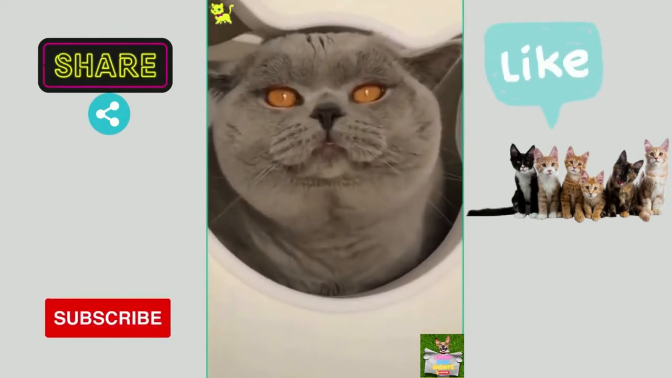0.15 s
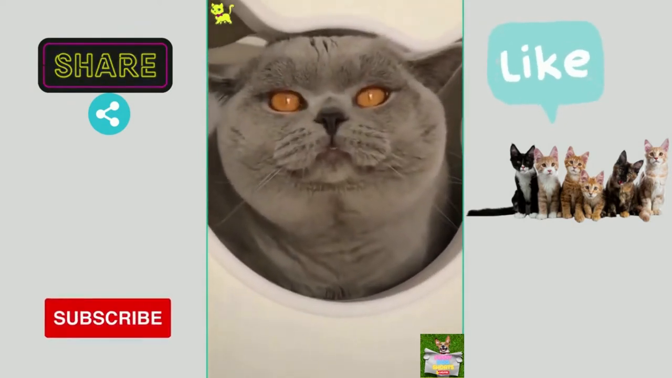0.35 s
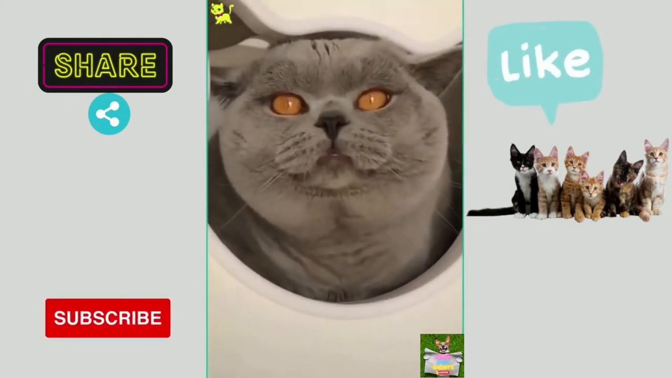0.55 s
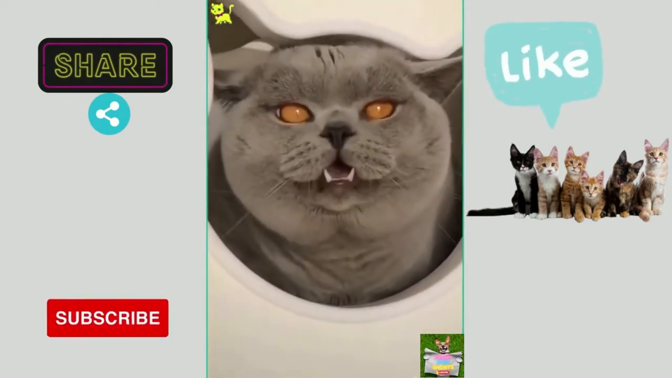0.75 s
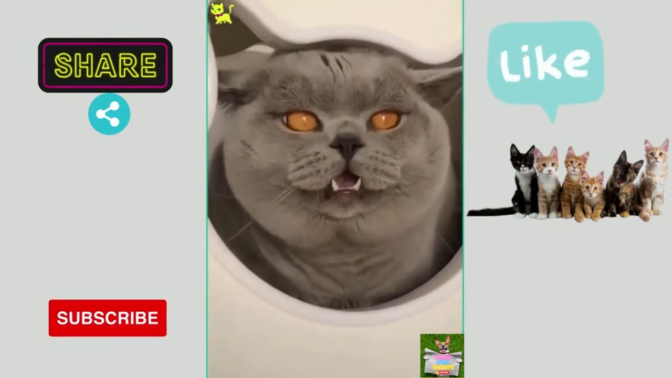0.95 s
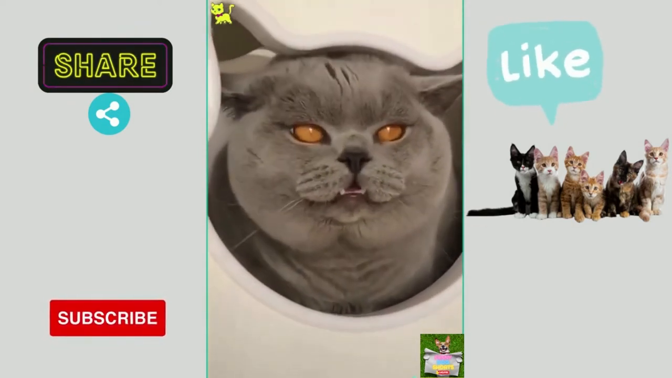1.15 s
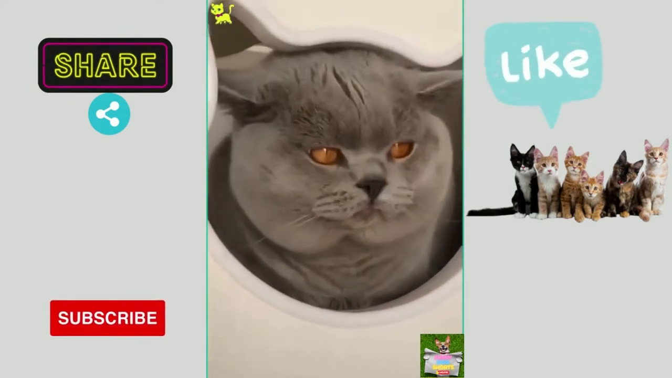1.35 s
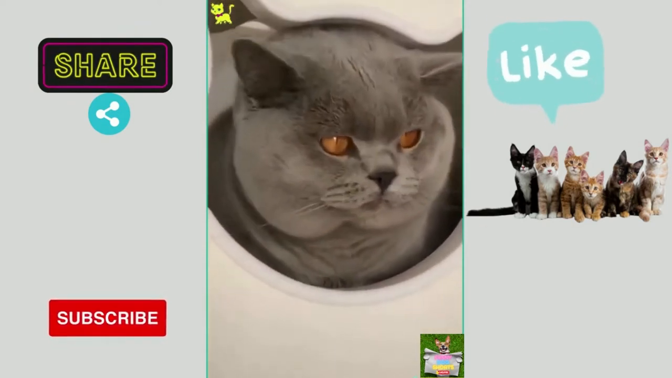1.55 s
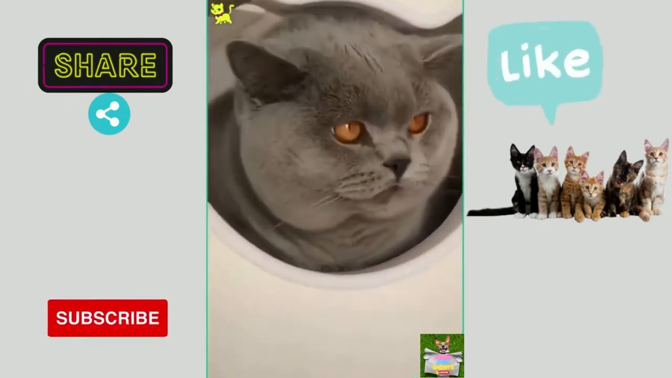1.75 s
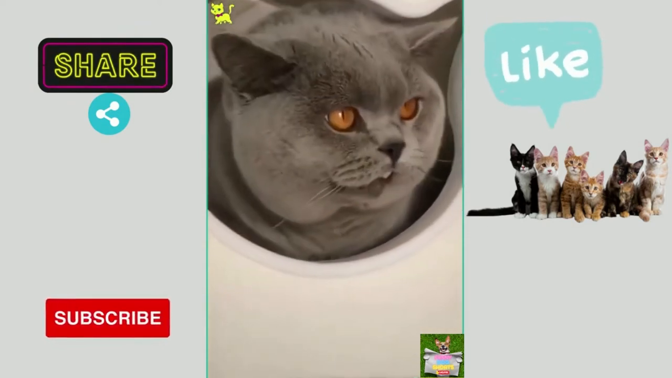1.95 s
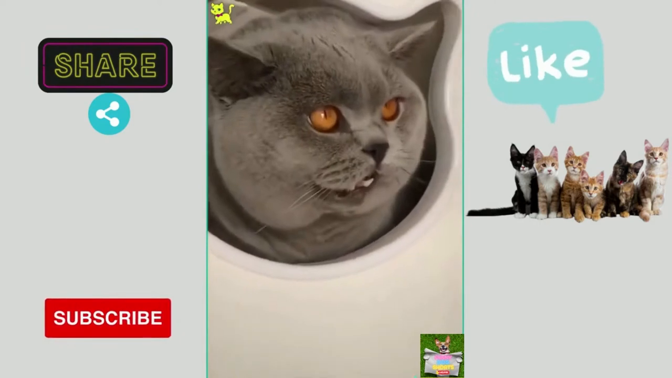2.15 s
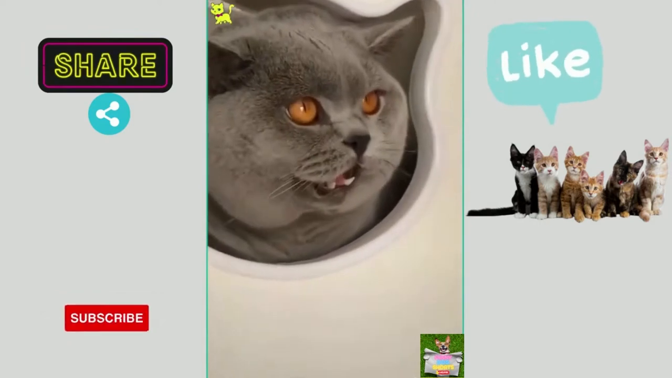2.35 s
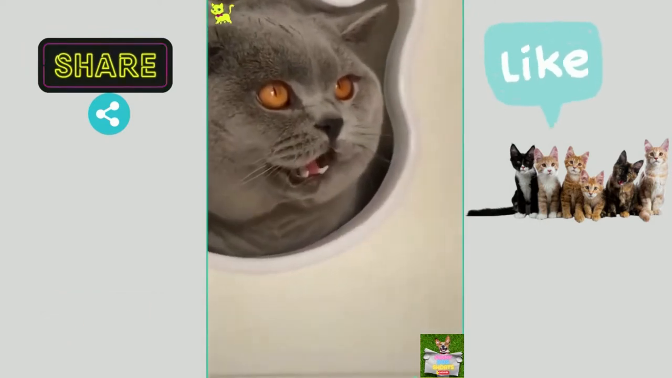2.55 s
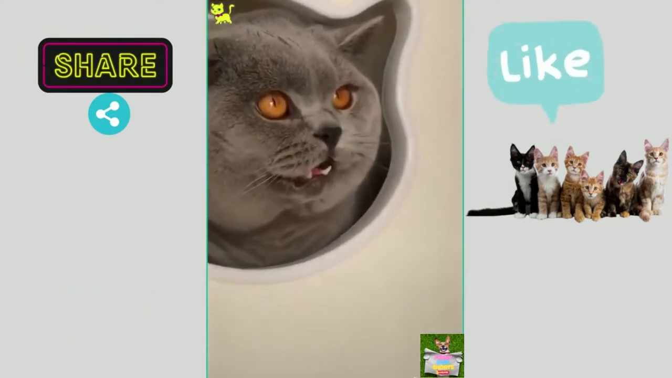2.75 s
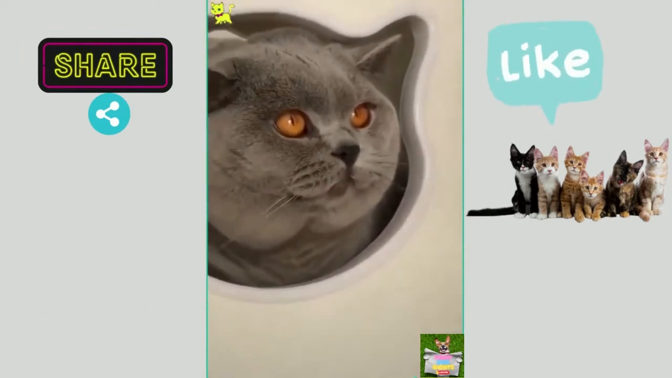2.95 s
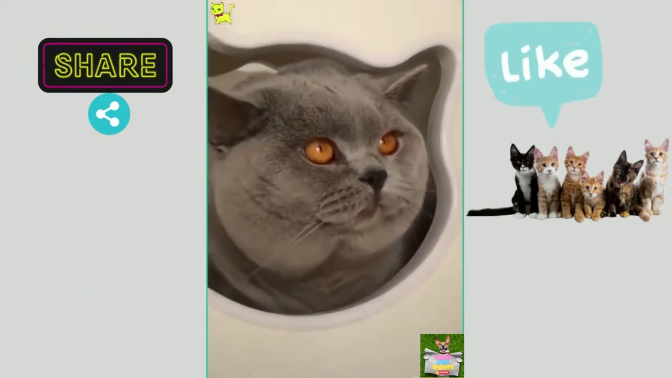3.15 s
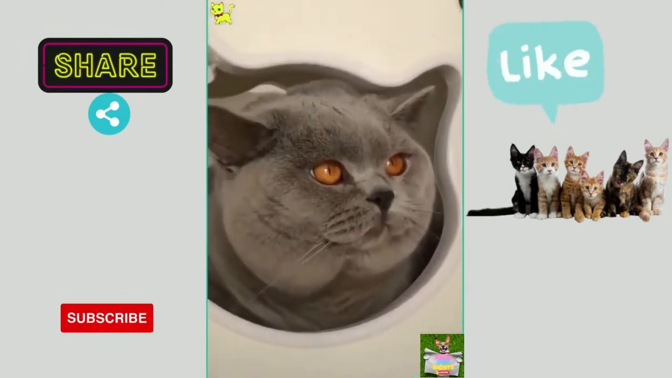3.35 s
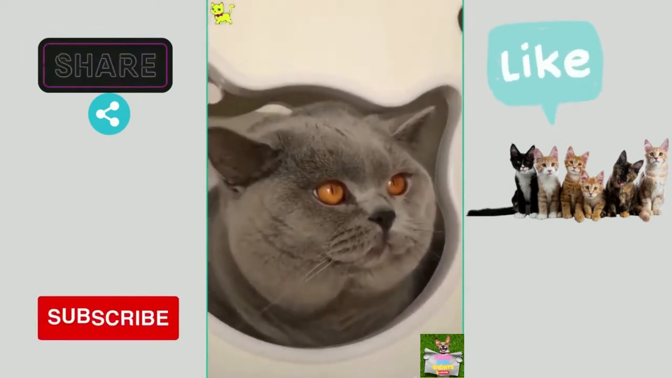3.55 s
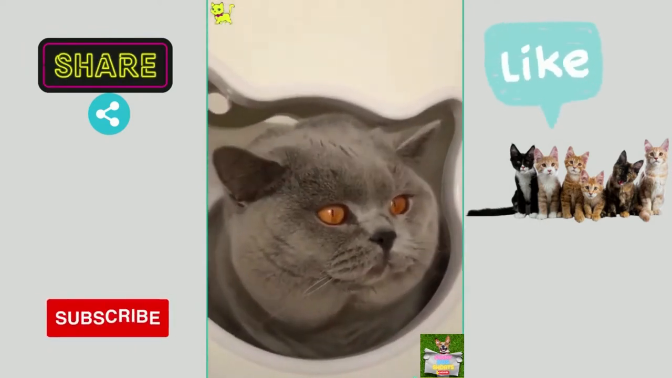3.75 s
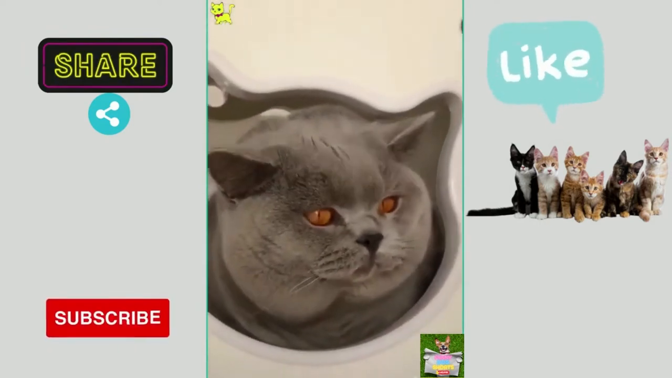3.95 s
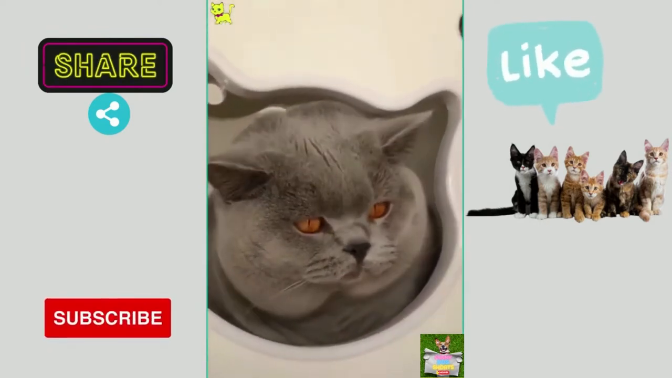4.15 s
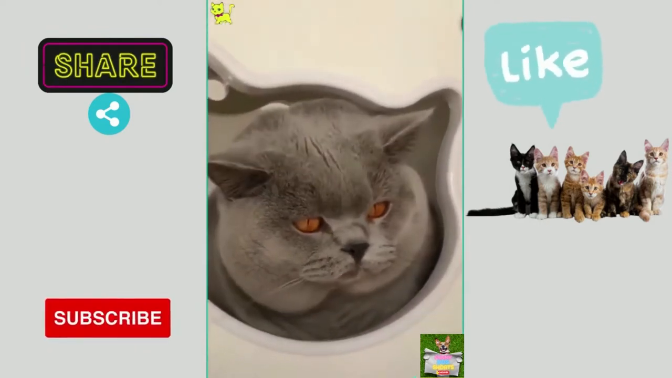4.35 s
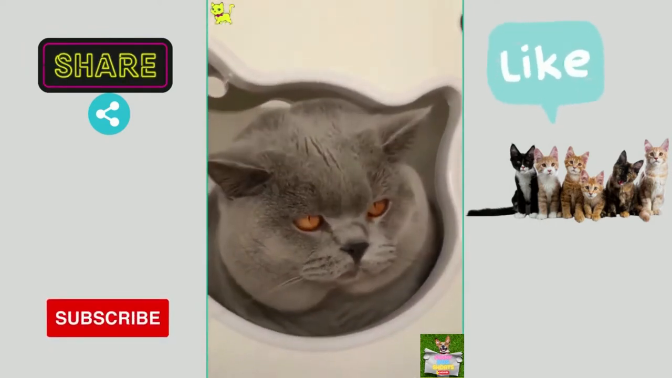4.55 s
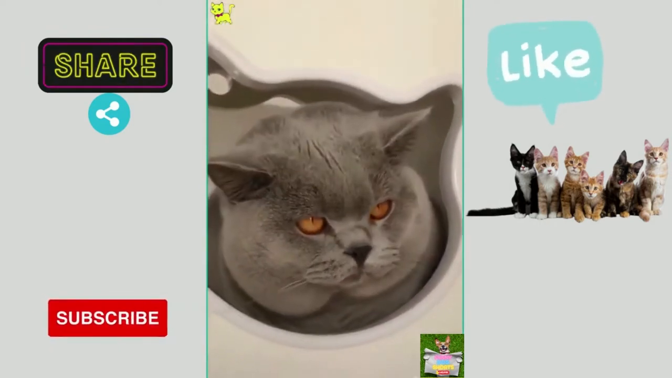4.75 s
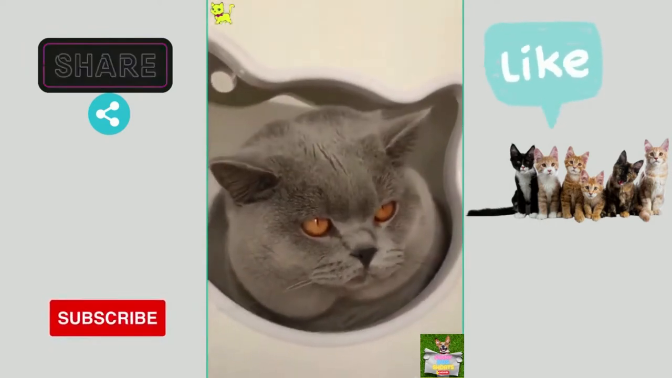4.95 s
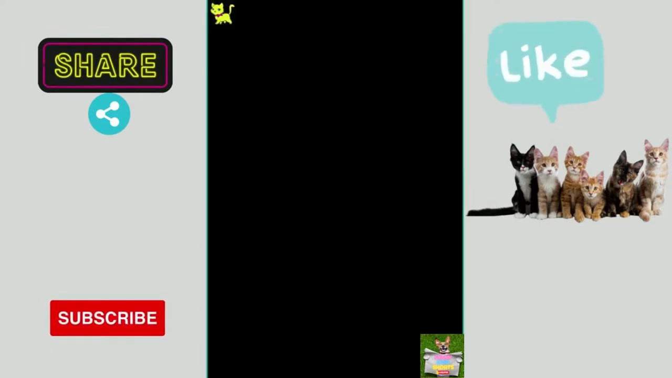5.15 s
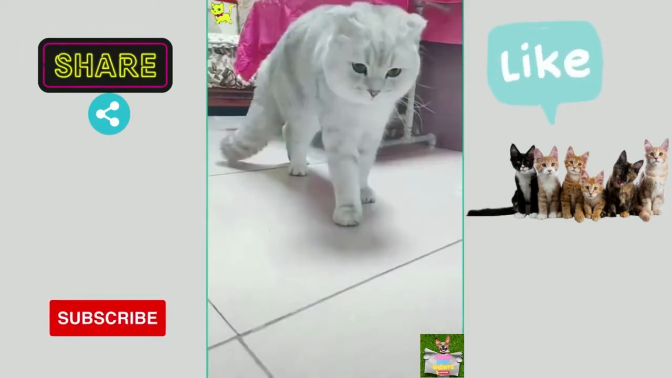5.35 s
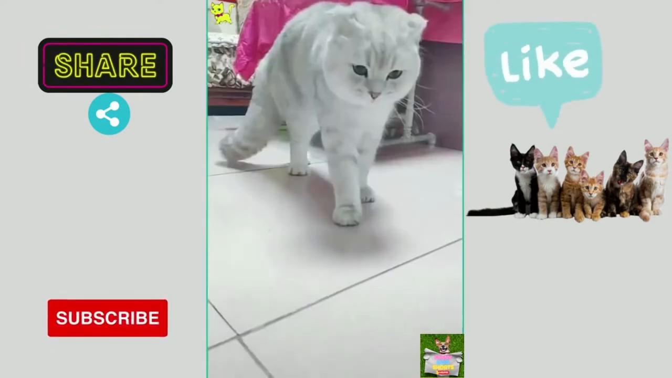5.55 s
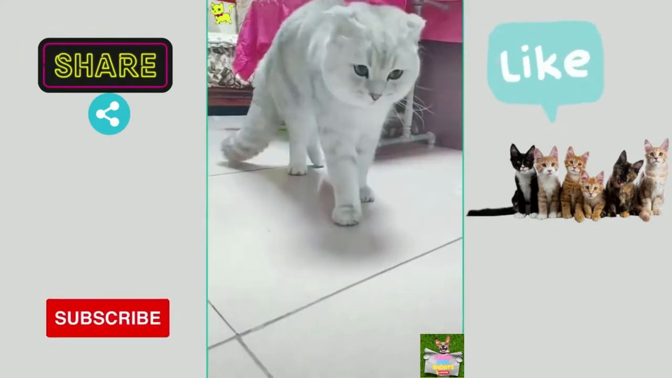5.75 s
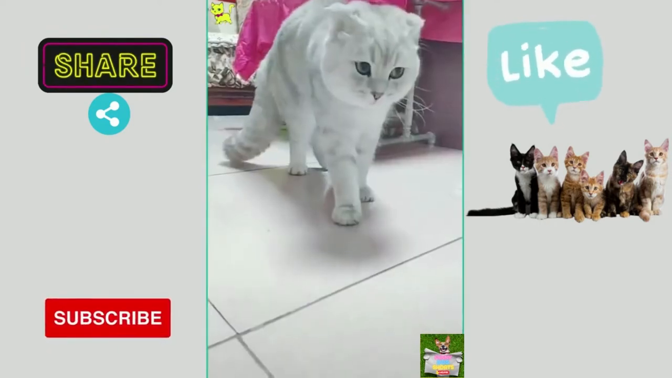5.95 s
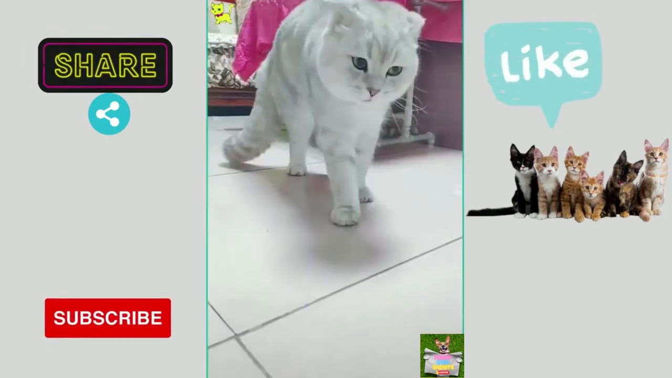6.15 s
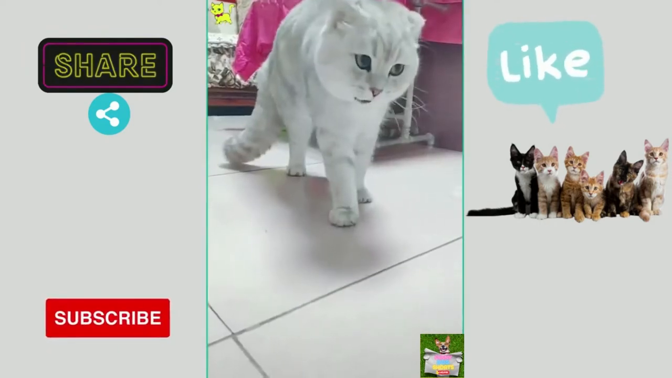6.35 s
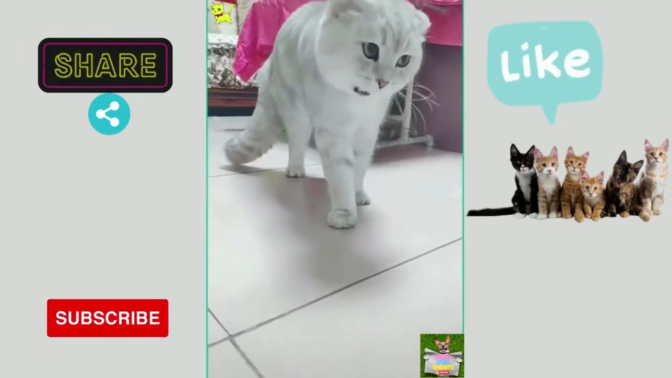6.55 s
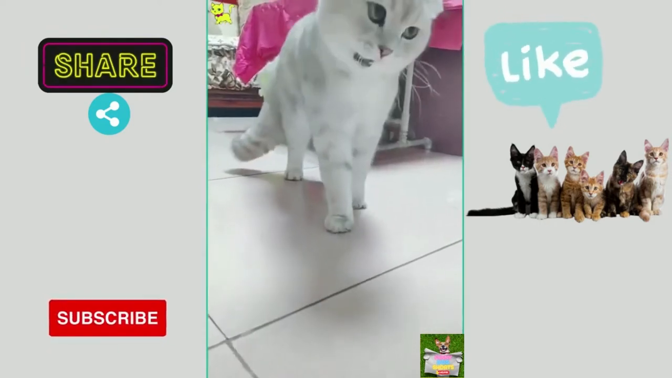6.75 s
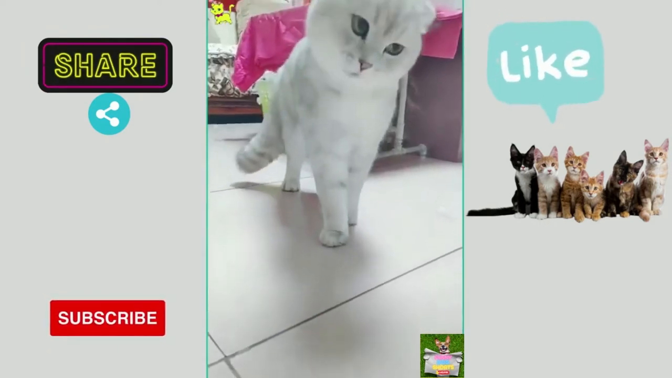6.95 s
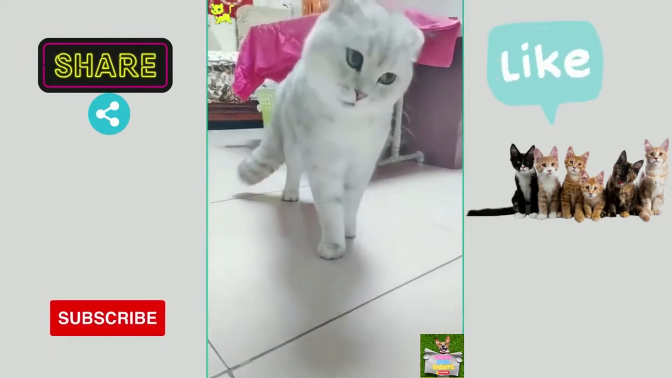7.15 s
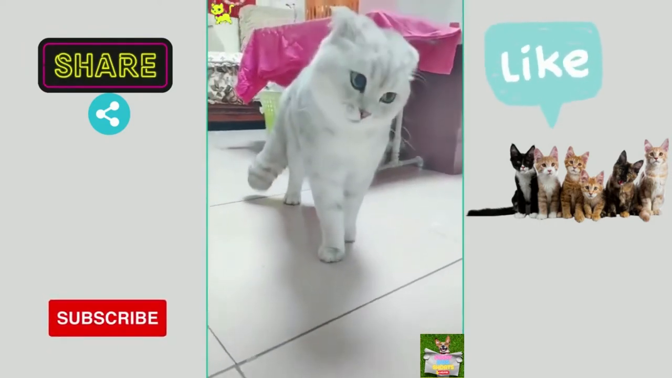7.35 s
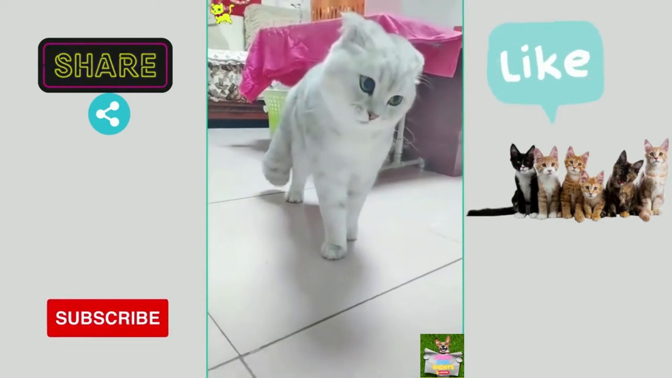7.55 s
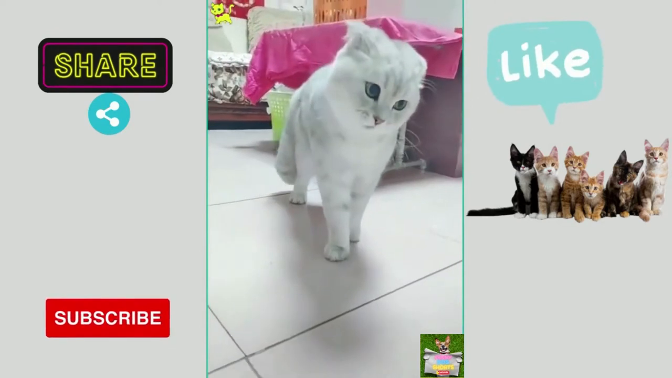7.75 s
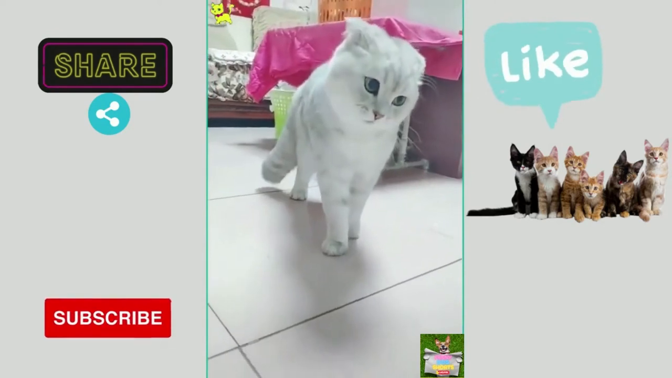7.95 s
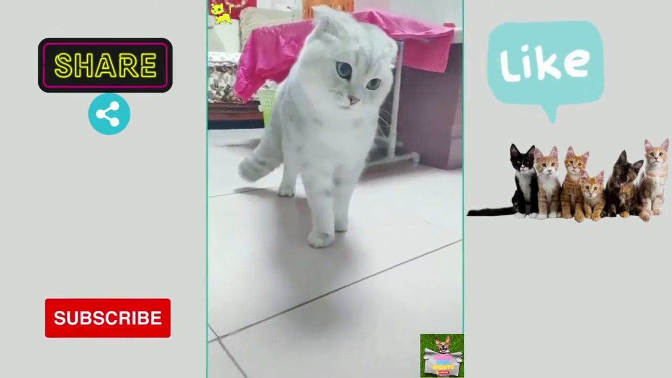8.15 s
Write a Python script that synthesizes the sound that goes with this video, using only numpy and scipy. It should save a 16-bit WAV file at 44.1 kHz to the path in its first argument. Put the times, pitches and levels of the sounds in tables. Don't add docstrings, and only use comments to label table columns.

```python
import sys
import numpy as np
from scipy import signal
from scipy.fft import rfft, irfft
from scipy.io import wavfile
from scipy.ndimage import uniform_filter1d, minimum_filter1d

SR = 44100
rng = np.random.default_rng(int(sys.argv[2]) if len(sys.argv) > 2 else 0)


def field_ratio(decibels):
    return 10 ** (np.asarray(decibels, dtype=float) / 20)


def generate_wav(signal):
    frames = np.transpose(np.atleast_2d(signal))
    scaled = np.clip(frames, -1, 1) * 32767
    pcm = np.round(scaled).astype(np.int16)
    wavfile.write(sys.argv[1], SR, pcm)


N = 362040

CUT_S = (5.333, 5.401)
# f/Hz, density/dB per Hz
HUM_AIR = [(12, -6), (20, 0), (60, 0.5), (108, -11.5), (137, -20), (284, -18), (762, -29), (988, -27.5),
           (1190, -28.5), (2100, -28), (2330, -34), (2590, -33.5), (4470, -41.5), (8340, -48),
           (10000, -45.5), (13000, -89), (22000, -120)]
HUM_DB = -41.5
# f/Hz, width/Hz, level/dB
HUM_LINES = [(54.4, 11, -49.5), (100.3, 1.1, -46.5)]
# t/s, rise/s, first level/dB, running level/dB
MOTOR = (4.05, .25, -68, -61)
# f/Hz, width/Hz, level/dB
MOTOR_LINES = [(2150, 60, -3), (2560, 80, 0), (3010, 70, -5), (3450, 70, -8)]
# f/Hz, density/dB per Hz
TILE_AIR = [(20, 0.5), (50, -11), (300, -23.5), (1000, -30), (2500, -33.5), (6000, -31), (8500, -35.5),
            (10000, -29.5), (12500, -28.5), (14000, -72)]
# first/dB, last/dB
TILE_DB = (-61.5, -57)
TILE_RISE_S, AFTER_CALL_DB = 0.69, 5
# t60/s, level/dB, slow dark tail/dB
GREY_ROOM = (0.39, -7.5, -10.5)
# t60/s, level/dB, slow dark tail/dB
WHITE_ROOM = (0.36, -8, -33.5)
# f/Hz, width/Hz, level/dB
GREY_MODES = [(1800, 30, 6), (1050, 210, -7)]
# f/Hz, width/Hz, level/dB
TILE_MODES = [(900, 5.6, 1), (384, 8, -10)]

# t/s, peak level/dB, f/Hz, ring t60/s, width/share of f
SMACKS = [
    (0.623, -28, 900, 0.016, 1.5),
    (4.789, -30, 1100, 0.014, 2.4),
    (4.843, -35, 1440, 0.036, 2.1),
    (5.401, -28, 494, 0.014, 1.55),
    (5.413, -46.5, 670, 0.018, 1.8),
    (0.3601, -44.5, 4440, 0.017, 0.25),
    (0.6, -42, 5600, 0.03, 0.19),
    (5.8132, -46.5, 7260, 0.016, 0.25),
    (5.875, -31, 10150, 0.016, 0.41),
    (5.917, -40, 5550, 0.014, 0.18),
]
# t/s, length/s, high whistle level/dB, low whistle level/dB
SNIFFS = [
    (7.894, .035, -35, -44),
    (7.92, .2, -44.5, -53.5),
    (8.025, .075, -34.5, -45),
    (8.15, .06, -52, -60),
    (5.88, .35, -70, -75),
    (4.52, .12, -66, -65),
    (4.84, .12, -62, -57),
    (7.7, .08, -73, -48),
]
# f/Hz, width/Hz
NOSE = [(9500, 1600), (5940, 8400)]
# start/s, end/s
TOP_S = (6.25, 7.92)
# f/(SR / 64), level/dB
TOP_TONES = [(11, -5), (12, -4.5), (13, -3), (14, 8), (15, 3), (16, 0), (17, -4.5), (18, -1.5), (19, -19)]
TOP_DB = (-5.5, -14.5)
TOP_FOLLOWS = (1.35, 0.96)

# t/s, half length/s, added roughness/0-1
RASPS = [(.64, .1, .55), (.76, .16, .3), (1.05, .25, .16), (2.54, .08, .2), (2.4, .2, .05), (3.05, .3, .14),
         (4.86, .25, .45), (6.17, .05, .18), (6.35, .24, .11), (6.8, .3, .03), (7.14, .09, .13),
         (7.87, .07, .4)]
SMOOTH_ROUGHNESS = .05
# f/Hz, width/Hz
NOTCH = (3350, 1200)

# t/s, pitch/Hz, effort/dB, tongue resonance/Hz, opening/0-1
GREY_START = [
    (.64, 402.5, -56.5, 1143, .9),
    (.698, 443.7, -35.5, 1100, 0.79),
    (.792, 429.3, -38.5, 1505, 0.86),
    (.832, 361.7, -39, 1460, 0.75),
    (1.04, 338.9, -33.5, 1737, 0.8),
    (1.09, 373, -37, 1544, 0.7),
    (1.122, 350.7, -36, 1495, 0.7),
    (1.28, 388.3, -37, 1380, 0.5),
    (1.4, 386, -41.5, 1120, 0.4),
]
# t/s, pitch/Hz, effort/dB, tongue resonance/Hz, opening/0-1
GREY_SWELL = [
    (1.62, 400.4, -43.5, 1170, 0.15),
    (1.699, 403.3, -36.5, 1150, 0.37),
    (1.801, 412.2, -30, 1230, 0.47),
    (2.032, 444.3, -24, 1970, 0.69),
    (2.445, 504.2, -22, 1800, 0.53),
    (2.522, 477.8, -22.5, 1910, 0.74),
    (2.598, 482.2, -21.5, 1780, 0.69),
    (2.77, 473, -18.5, 1950, 0.61),
    (2.944, 440, -23.5, 1800, 0.7),
]
# t/s, pitch/Hz, effort/dB, tongue resonance/Hz, opening/0-1
GREY_MOAN = [
    (3.08, 388.4, -51, 1380, 0.069),
    (3.336, 271.8, -54.5, 1070, 0.12),
    (3.648, 257.2, -53.5, 1037, .2),
    (3.881, 260.1, -54, 1022, 0.15),
    (4.06, 224.2, -59, 1164, 0.067),
    (4.392, 259.4, -53, 993, 0.36),
    (4.564, 251.7, -55, 1050, 0.15),
    (4.762, 180, -62.5, 1065, .02),
    (4.859, 170.2, -84, 1154, .1),
]
# f/Hz, f/Hz
GREY_THROAT_HZ = (1905, 2930)
# f/Hz, f/Hz
GREY_PALATE_HZ = (2900, 4916)
# f/Hz, width/Hz, level/dB
GREY_UPPER = [(560, 0), (3350, 500, 6), (5400, 700, -3), (6400, 500, -1), (8600, 400, -22)]
GREY_REF_DB = -35
# level at reference effort/dB, slope/dB per dB, gain when open/dB
GREY_LOW = (-53.5, .1, -12)
# level at reference effort/dB, slope/dB per dB, gain when open/dB
GREY_MOUTH = (-38, 0.46, 1.3)
# level at reference effort/dB, slope/dB per dB, gain when open/dB
GREY_TOP = (-55, 0.33, .1)
# level at reference effort/dB, slope/dB per dB, gain when open/dB
GREY_SHEEN = (-16, .6, .1)
# f/Hz, width/Hz, level/dB
CHEST = (395, 100, 17)
GLARE_HZ, GLARE_DB_PER_HZ = 426, 0.1646
DULL_HZ, DULL_DB_PER_HZ = 353, 0.4

# t/s, pitch/Hz, effort/dB, opening/0-1
WHITE = [
    [(5.4, 321, -33.5, 0.01), (5.46, 360, -41, .01), (5.74, 500.2, -44, 0), (5.88, 538, -38.5, .01)],
    [(5.982, 596.7, -32, 0.08), (6.12, 616.6, -31.5, 0.16), (6.17, 600.4, -27.5, 0.41),
     (6.26, 640.7, -28, 0.19), (6.33, 601.7, -29, 0.14), (6.454, 577.6, -32.5, 0.28),
     (6.48, 542, -27, 0.45)],
    [(6.52, 635, -27, 0.5), (6.602, 795, -22.5, 1), (6.72, 841, -15.5, 1), (6.748, 874.6, -14.5, 1),
     (6.8, 858.2, -14.5, 1), (6.93, 807.3, -12.5, 0.99), (7.04, 755, -13, 0.76), (7.1, 650, -19.5, 0.9),
     (7.15, 641.6, -24.5, 0.4)],
    [(7.222, 653.4, -17, 0.3), (7.236, 632, -17.5, 0.93), (7.275, 631.2, -17, 0.88),
     (7.348, 602.5, -17, 0.69), (7.39, 566.1, -18.5, 0.63), (7.5, 566.7, -27.5, 0.73),
     (7.694, 516, -32, 0.45), (7.82, 465.3, -36, 0.47), (7.89, 371, -24.5, 0.07)],
]
# time of one beat, setting the phase only/s, end/s, rate/Hz, depth/0-1
TRILL = (1.7, 5.62, 31, 0.61)
# f/Hz, f/Hz
WHITE_THROAT_HZ = (2120, 2095)
# f/Hz, f/Hz
WHITE_PALATE_HZ = (4360, 5054)
# f/Hz, width/Hz, level/dB
WHITE_UPPER = [(500, 0), (5800, 700, 0), (6900, 1000, -1)]
# f/Hz, width/Hz, level/dB
JAW = [(1246, 530, 12.5), (878, 370, 15)]
MOUTH_PER_PITCH, PIVOT_HZ, THROAT_HZ_PER_HZ = 2.05, 619, 3.75
LOW_DB_PER_HZ, LOW_SPAN_HZ = 0.1461, 68
OPEN_LOW_DB, LOW_SLOPE, OPEN_MOUTH_DB = -33.5, 0.1, -9
OPEN_TOP_DB, TOP_SLOPE = -9, 0.75
NOSE_DB, NOSE_CLEAR_HZ, NOSE_SPAN_HZ = 9.5, 680, 87.4


def evened(x):
    return x / np.sqrt(np.mean(x ** 2) + 1e-20)


def drift(count, hz):
    return evened(signal.lfilter(*signal.butter(2, 2 * hz / SR), rng.standard_normal(count)))


def add(mix, s, sound):
    part = mix[..., round(s * SR):][..., :sound.shape[-1]]
    part += sound[..., :part.shape[-1]]


def between(ends, share):
    return ends[0] + (ends[1] - ends[0]) * share


def bump(hz, centre, width):
    return (1 + (2 * (hz - centre) / width) ** 2) ** -1.5


def resonate(x, hz, width):
    turn = np.exp(2j * np.pi * np.cumsum(hz * np.ones(len(x))) / SR)
    r = np.exp(-np.pi * width / SR)
    return 2 * (turn * signal.lfilter([1 - r], [1, -r], x / turn + 1e-18)).real


def ring(x, hz, width):
    return evened(resonate(resonate(x, hz, width), hz, width))


def low_pass(x, hz):
    return signal.sosfiltfilt(signal.butter(10, 2 * hz / SR, output="sos"), x)


def air(spectrum, db):
    hz = np.fft.rfftfreq(N, 1 / SR)
    f, level = np.transpose(spectrum)
    shape = field_ratio(np.interp(np.log(hz + 1), np.log(f + 1), level))
    return field_ratio(db) * evened(irfft(rfft(rng.standard_normal(N)) * shape, N))


def narrow(lines):
    hz = np.fft.rfftfreq(N, 1 / SR)
    shape = sum(field_ratio(db) * bump(hz, centre, width) / np.sqrt(width) for centre, width, db in lines)
    return irfft(rfft(rng.standard_normal(N)) * shape, N) * np.sqrt(SR)


def appliance():
    return air(HUM_AIR, HUM_DB) + narrow(HUM_LINES)


def motor():
    t = np.arange(N) / SR
    start, rise, *levels_db = MOTOR
    level = field_ratio(between(levels_db, np.clip((t - start) / rise, 0, 1)))
    return level * (t > start) * narrow(MOTOR_LINES)


def tiled_room_air():
    t = np.arange(N) / SR
    rise = np.clip((t - CUT_S[1]) / TILE_RISE_S, 0, 1)
    tiles = air(TILE_AIR, between(TILE_DB, rise) + AFTER_CALL_DB * (t > TOP_S[1]))
    calling = (t > TOP_S[0]) & (t < TOP_S[1])
    return np.where(calling, low_pass(tiles, 7700), tiles)


def ringing(x, modes):
    return x + sum(field_ratio(db) * resonate(x, hz, width) for hz, width, db in modes)


def room(x, t60, db, late_db):
    t = np.arange(SR // 2) / SR
    taps = rng.standard_normal(len(t)) * (t > .004)
    dull = signal.lfilter(*signal.butter(1, [2 * 700 / SR, 2 * 3000 / SR], "band"), taps)
    bright = signal.lfilter(*signal.butter(2, 2 * 3000 / SR, "high"), taps)
    dark = signal.lfilter(*signal.butter(2, 2 * 1300 / SR), taps)
    tail = dull * field_ratio(-60 * t / t60) + bright * field_ratio(-110 * t / t60)
    tail += dark * field_ratio(late_db - 24 * t / t60)
    return x + field_ratio(db) * signal.fftconvolve(x, tail / np.linalg.norm(tail))[:N]


def starved(x, depth_db):
    hz, s, z = signal.stft(x, SR, nperseg=1024)
    level = uniform_filter1d(abs(z) ** 2, size=4, axis=0)
    loud = -minimum_filter1d(-level, size=41, axis=0)
    weak = level < loud / field_ratio(2 * depth_db)
    dropped = weak & (hz > 450)[:, None] & (abs(s - 6.9) < .95)
    return signal.istft(z * np.where(dropped, .1, 1), nperseg=1024)[1][:N]


def mouth_noises():
    out, t = np.zeros((2, N)), np.arange(1500) / SR
    for s, db, hz, t60, spread in SMACKS:
        tick = ring(rng.standard_normal(len(t)), hz, spread * hz)
        add(out, s, .5 * field_ratio(db - 60 * t / t60) * tick)
    for s, length, high_db, low_db in SNIFFS:
        gust, apart = rng.standard_normal((2, round(length * SR)))
        swell = np.sin(np.pi * np.linspace(0, 1, len(gust)) ** 0.52) ** 2
        high = ring(gust, *NOSE[0]) + 0.15 * ring(apart, *NOSE[0]) * [[1], [-1]]
        low = ring(gust, *NOSE[1])
        add(out, s, swell * (field_ratio(high_db) * high + field_ratio(low_db) * low))
    return out


def top_band(upper_db):
    t, out = np.arange(*TOP_S, 1 / SR), np.zeros((2, N))
    sides = np.array([[1], [-1]])
    blocks = np.arange(len(t)) // 1024
    voice_db = upper_db[round(TOP_S[0] * SR):][:len(t)] + 26
    for k, db in TOP_TONES:
        hz = k * SR / 64
        on, hissy, size, lean, turn, split = rng.random((blocks[-1] + 1, 6)).T
        held = np.arange(len(on)) // 2 * 2
        gains = field_ratio(db + 16 * (size - .5) + 5 * (lean[held] - .5) * sides) * (on[held] < .66)
        phase = uniform_filter1d((4 * turn + 0.74 * (split[held] - .5) * sides)[:, blocks], 500)
        hiss = ring(rng.standard_normal(len(t)), hz, 250)
        patches = uniform_filter1d(.5 * (hissy < .1)[blocks], 700)
        band = np.cos(2 * np.pi * hz * t + phase) + patches * hiss
        upper = int(k > 15)
        level = field_ratio(TOP_DB[upper] - 27 + TOP_FOLLOWS[upper] * voice_db)
        add(out, TOP_S[0], 0.78 * uniform_filter1d(gains[:, blocks], 400) * band * level)
    return out


def controls(phrases):
    s, *columns = np.transpose(sum(phrases, []))
    t = np.arange(s[0], s[-1], 1 / SR)
    return (t, *(np.interp(t, s, c) for c in columns))


def meow(t, hz, cavities_hz, levels_db, upper, mouth_width, throat_width, jitter, shimmer_db, count):
    mouth_hz, throat_hz, palate_hz = cavities_hz
    low_db, mouth_db, throat_db, upper_db, top_db, notch_db = levels_db
    rough = SMOOTH_ROUGHNESS + sum(more * np.maximum(1 - abs(t - s) / half, 0) for s, half, more in RASPS)
    turns = np.cumsum(hz * (1 + jitter * (.5 + 12 * rough) * drift(len(t), 45))) / SR

    step, ones = slice(None, None, 64), np.ones(len(t))
    f = np.arange(2, count)[:, None] * hz[step]
    palate = (palate_hz, upper[0][0], upper[0][1] * ones)
    upper = [palate] + [(centre * ones, width, db + top_db) for centre, width, db in upper[1:]]
    mouth = bump(f, mouth_hz[step], mouth_width) + 0.24 * bump(f, 820, 450)
    throat = bump(f, throat_hz[step], throat_width)
    head = sum(field_ratio(db[step]) * bump(f, centre[step], width) for centre, width, db in upper)
    levels = field_ratio(np.array([mouth_db, throat_db, upper_db]))
    weights = sum(c / np.linalg.norm(c, axis=0) * level[step]
                  for c, level in zip((mouth, throat, head), levels))
    weights /= field_ratio(notch_db[step] * bump(f, *NOTCH))

    tone = np.zeros(len(t))
    for k, weight in enumerate(weights):
        waver = field_ratio(shimmer_db * uniform_filter1d(rng.standard_normal(len(weight)), 25) * 4.2)
        uneven = uniform_filter1d(rng.standard_normal(len(weight)), size=4)
        rasp = 1 + (3 * rough[step] + 0.016 * k) * uneven
        level = np.interp(t, t[step], weight * waver * rasp)
        tone += level * np.cos(2 * np.pi * ((k + 2) * turns + rng.random()))

    puffs = (0.87 + np.exp(-(turns % 1) / 0.57)) * rng.standard_normal(len(t))
    breath = levels[0] * ring(puffs, mouth_hz, 0.22 * mouth_width)
    breath += levels[1] * ring(puffs, throat_hz, 2.3 * throat_width)
    breath += 3 * levels[2] * sum(field_ratio(db - 4) * ring(puffs, centre, width) for centre, width, db in upper)
    breath -= (1 - 1 / field_ratio(notch_db)) * resonate(breath, *NOTCH)
    breath += 0.7 * field_ratio(low_db) * ring(puffs, 1.33 * hz, 300)

    fundamental = field_ratio(low_db) * np.cos(2 * np.pi * turns)
    voice = np.sqrt(2) * (fundamental + np.sqrt(1 - rough ** 2) * tone) + 0.45 * rough * breath
    out = np.zeros(N)
    add(out, t[0], voice * signal.windows.tukey(len(t), .004))
    return out


def grey_cat():
    t, hz, effort_db, tongue_hz, opening = controls([GREY_START, GREY_SWELL, GREY_MOAN])
    opening = np.clip(opening, 0, 1)
    low_db, mouth_db, upper_db, top_db = (
        db + slope * (effort_db - GREY_REF_DB) + open_db * opening
        for db, slope, open_db in (GREY_LOW, GREY_MOUTH, GREY_TOP, GREY_SHEEN))
    chest_db = CHEST[2] * bump(hz, *CHEST[:2]) * (1 - opening) ** 2
    low_db = low_db + 0.123 * np.maximum(230 - hz, 0) + chest_db
    glare_db = GLARE_DB_PER_HZ * np.maximum(hz - GLARE_HZ, 0)
    dull_db = DULL_DB_PER_HZ * np.maximum(DULL_HZ - hz, 0)
    mouth_db = mouth_db - 0.57 * glare_db
    upper_db = upper_db + glare_db - dull_db
    top_db = top_db + .5 * glare_db
    cavities_hz = tongue_hz, between(GREY_THROAT_HZ, opening), between(GREY_PALATE_HZ, np.sqrt(opening))
    levels_db = low_db, mouth_db, effort_db, upper_db, top_db, 0 * t
    return meow(t, hz, cavities_hz, levels_db, GREY_UPPER, mouth_width=640, throat_width=680,
                jitter=.004, shimmer_db=2.2, count=26)


def trill():
    start, end, rate, depth = TRILL
    t = np.arange(N) / SR
    fade = np.clip((end - t) / 0.023, 0, 1) * depth
    return 1 - fade * np.cos(np.pi * rate * (t - start)) ** 6


def white_cat():
    t, hz, effort_db, opening = controls(WHITE)
    opening, high_hz = np.clip(opening, .003, 1), hz - PIVOT_HZ
    out_db = effort_db + 20 * np.log10(opening)
    open_low_db = OPEN_LOW_DB + LOW_SLOPE * (effort_db + 18.5)
    open_low_db += LOW_DB_PER_HZ * np.minimum(high_hz, LOW_SPAN_HZ)
    low_db = between((effort_db, open_low_db), opening)
    mouth_db = out_db + OPEN_MOUTH_DB + sum(db * bump(2 * hz, centre, width) for centre, width, db in JAW)
    upper_db = OPEN_TOP_DB + TOP_SLOPE * (out_db + 9) - 11.5
    upper_db += 20 * np.log10(np.minimum(opening / .12, 1))
    nose_db = NOSE_DB * np.clip((NOSE_CLEAR_HZ - hz) / NOSE_SPAN_HZ, 0, 1)
    mouth_hz = np.maximum(MOUTH_PER_PITCH * hz, 950)
    throat_hz = between(WHITE_THROAT_HZ, opening) + THROAT_HZ_PER_HZ * np.maximum(high_hz, 0)
    cavities_hz = mouth_hz, throat_hz, between(WHITE_PALATE_HZ, opening)
    levels_db = low_db, mouth_db, out_db, upper_db, 0 * t, nose_db
    voice = meow(t, hz, cavities_hz, levels_db, WHITE_UPPER, mouth_width=270, throat_width=1300,
                 jitter=0.0032, shimmer_db=3.54, count=20)
    return voice * trill(), np.interp(np.arange(N) / SR, t, upper_db)


def scene():
    t = np.arange(N) / SR
    small = mouth_noises()
    grey = room(ringing(grey_cat(), GREY_MODES), *GREY_ROOM)
    first = low_pass(grey + appliance() + motor() + small[0], 9400)
    voice, upper_db = white_cat()
    white = low_pass(room(ringing(voice, TILE_MODES), *WHITE_ROOM), 7200)
    second = starved(white + tiled_room_air(), 31) + small + top_band(upper_db)
    return first * (t < CUT_S[0]) + second * (t > CUT_S[1])


def top_cut(x):
    return signal.sosfilt(signal.butter(12, 13350, fs=SR, output="sos"), x)


def record(dry):
    limited = dry / (1 + abs(dry / .95) ** 12) ** (1 / 12)
    return top_cut(limited)


dry = scene()
out = record(dry)
generate_wav(out)
```